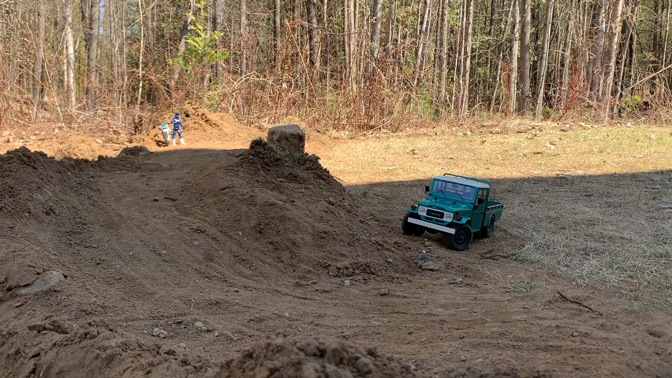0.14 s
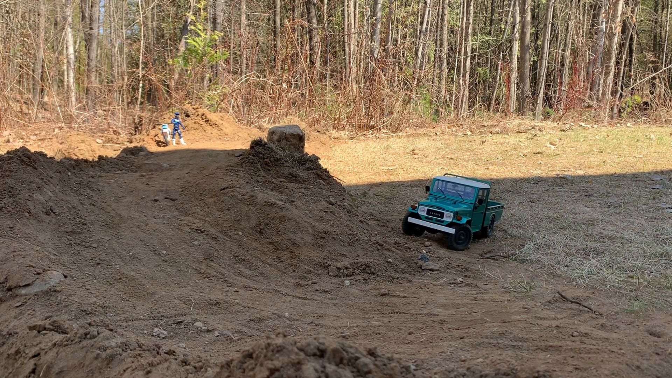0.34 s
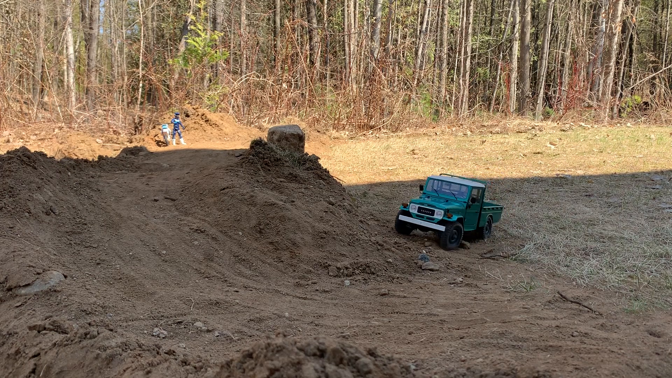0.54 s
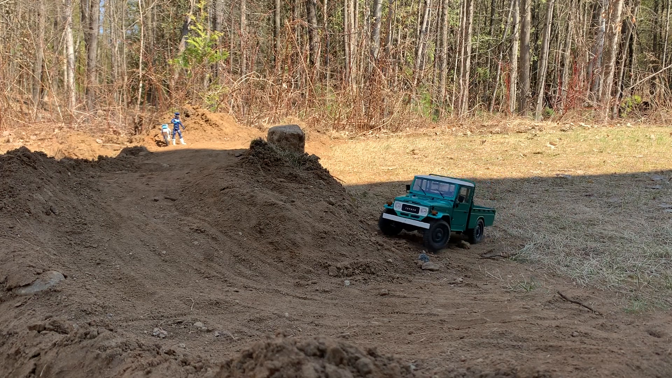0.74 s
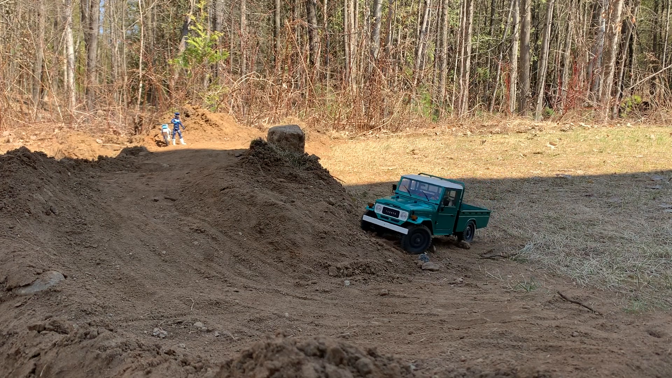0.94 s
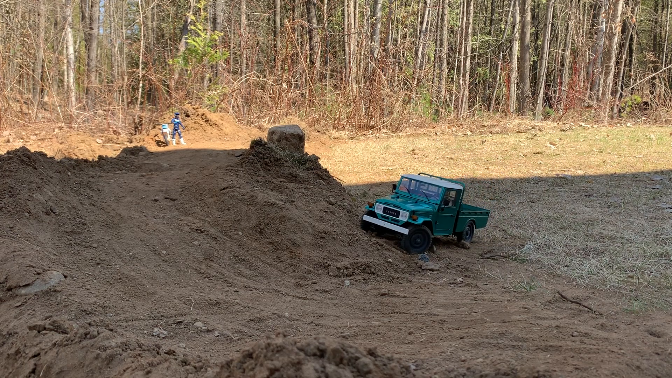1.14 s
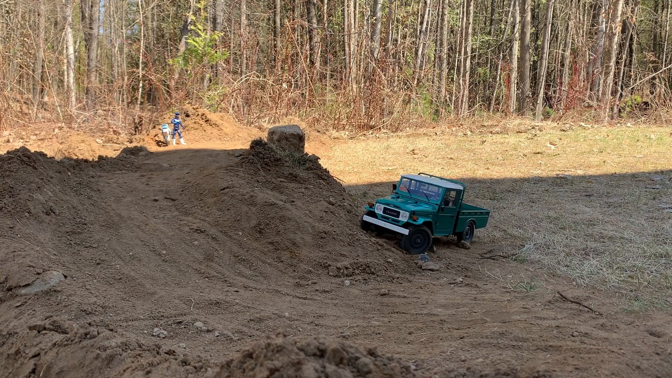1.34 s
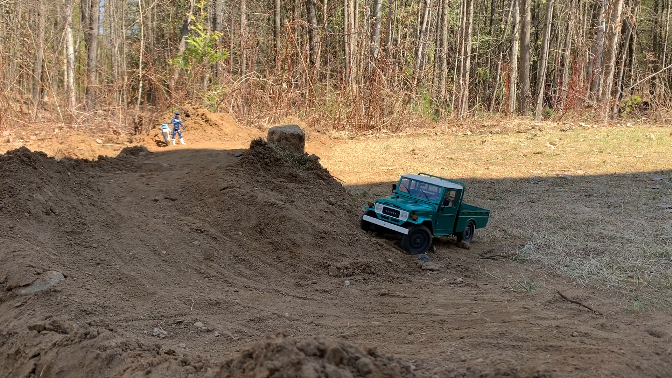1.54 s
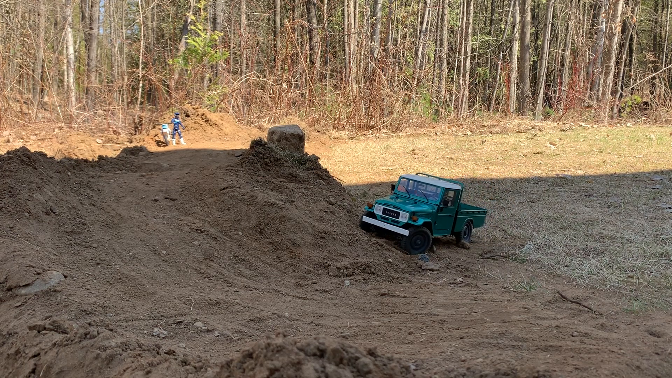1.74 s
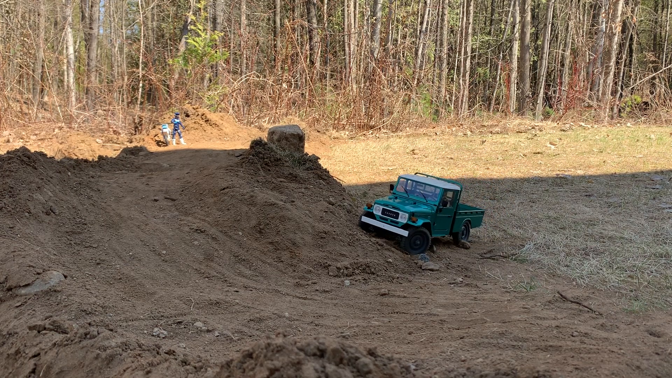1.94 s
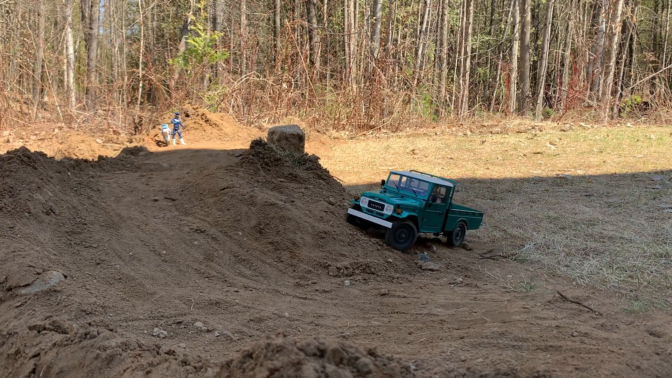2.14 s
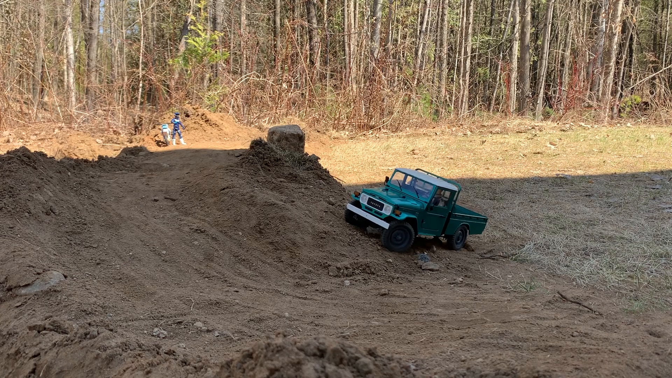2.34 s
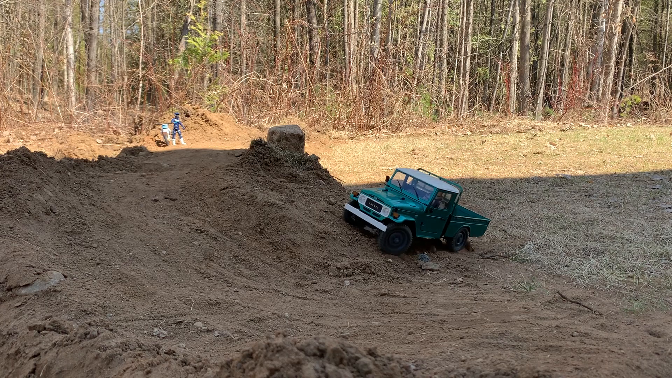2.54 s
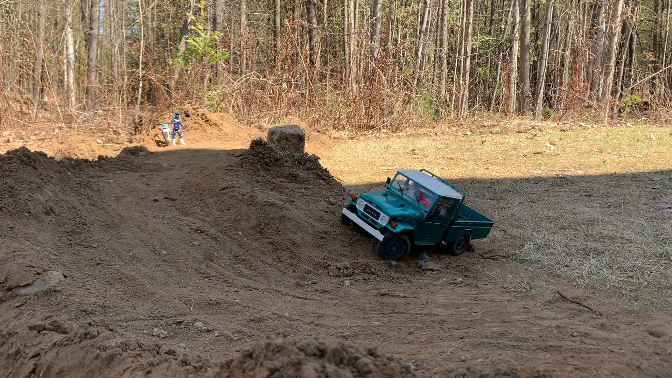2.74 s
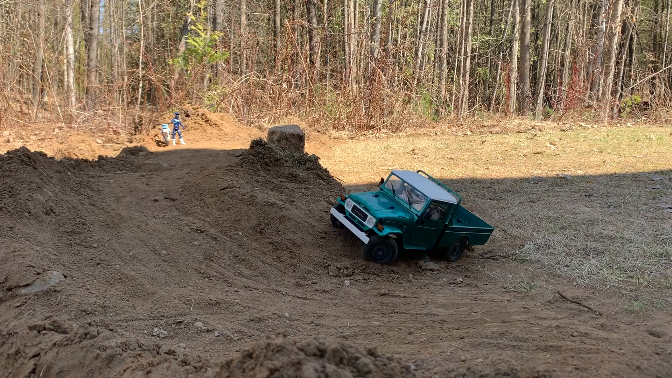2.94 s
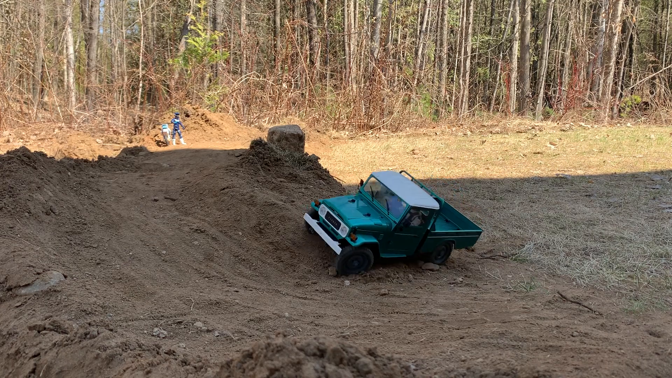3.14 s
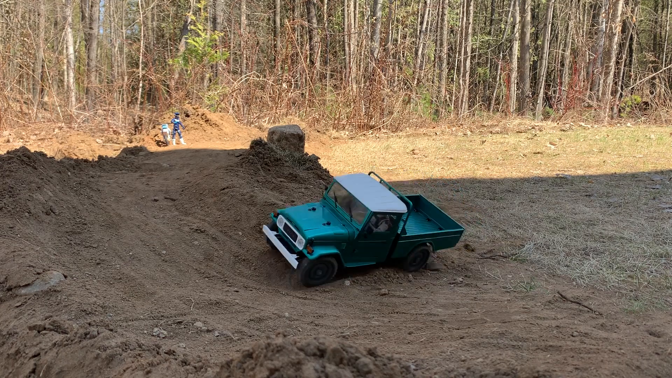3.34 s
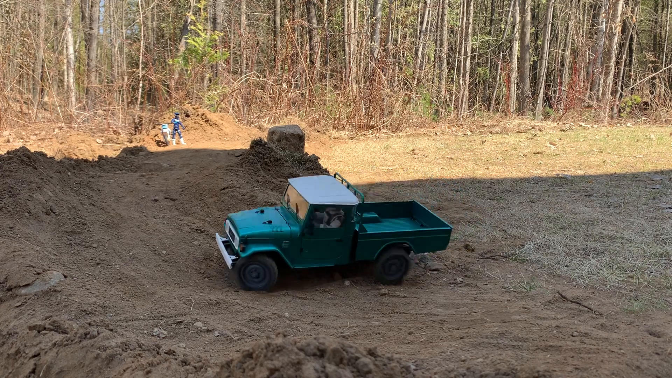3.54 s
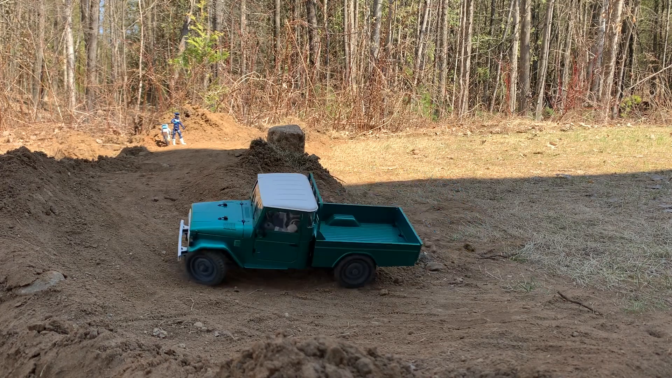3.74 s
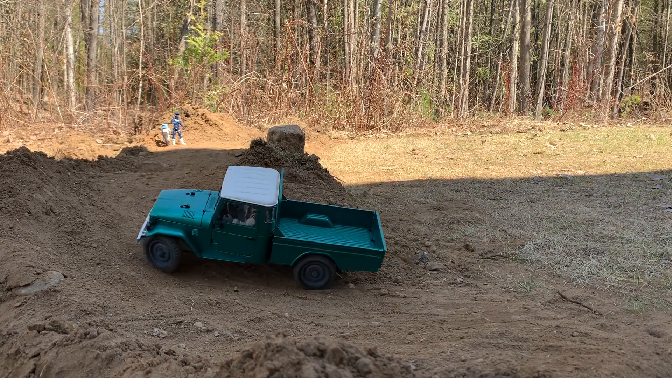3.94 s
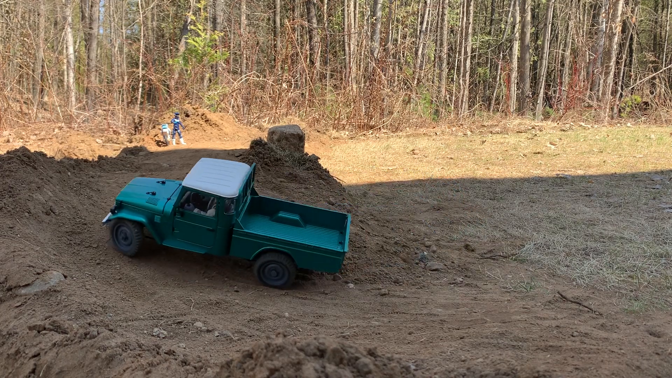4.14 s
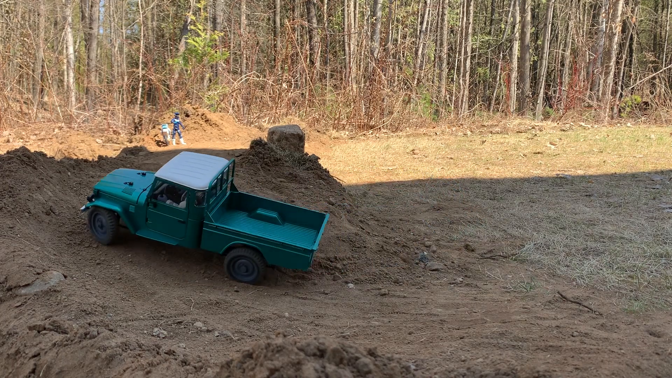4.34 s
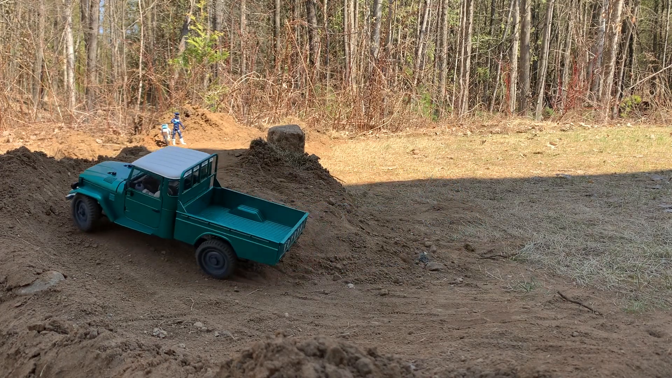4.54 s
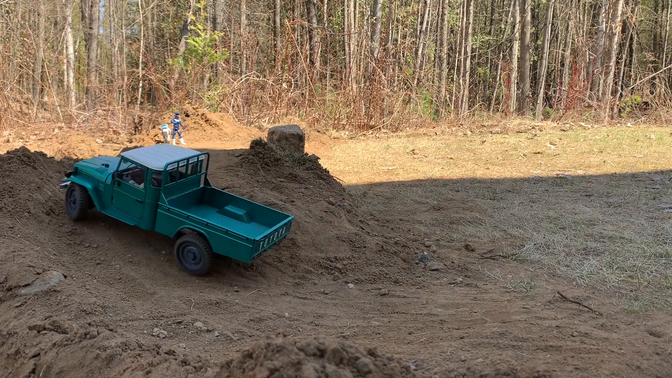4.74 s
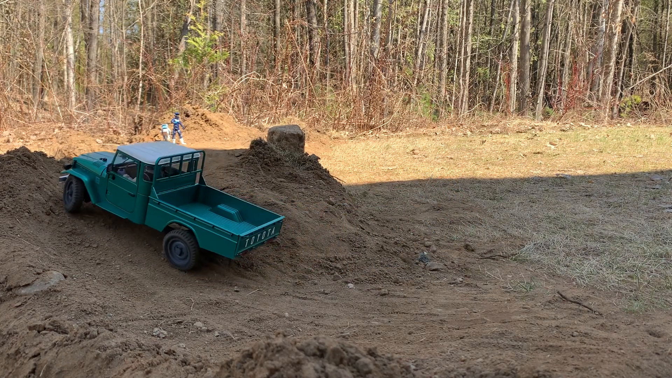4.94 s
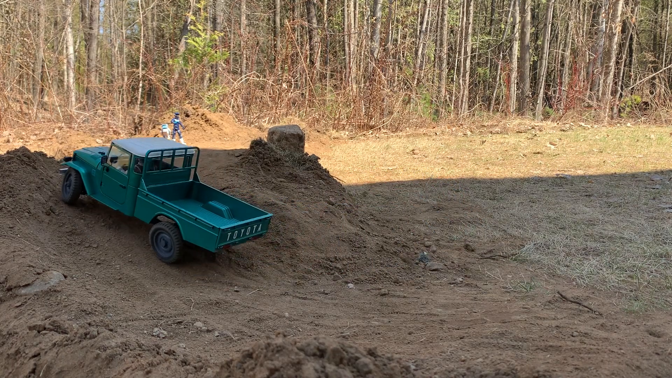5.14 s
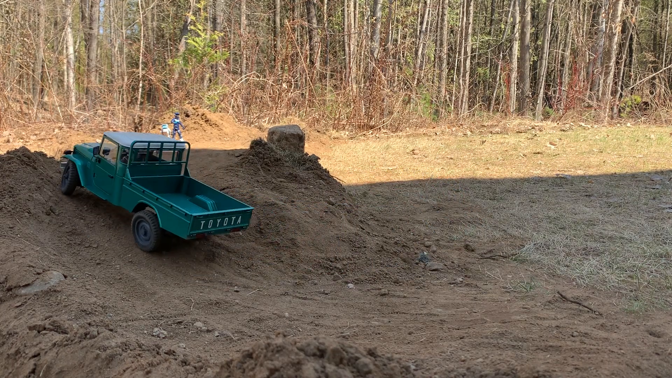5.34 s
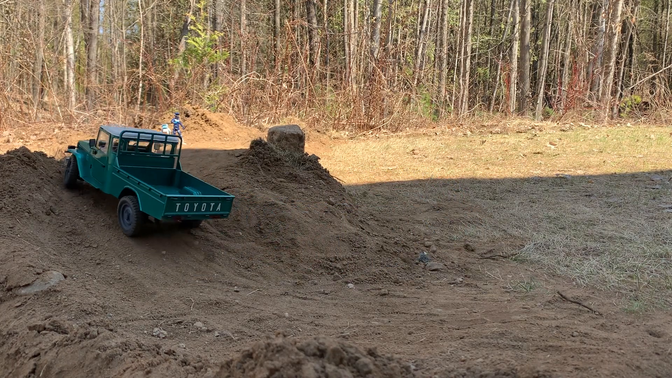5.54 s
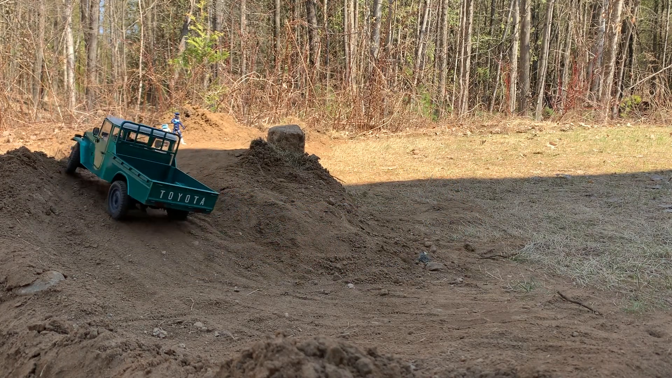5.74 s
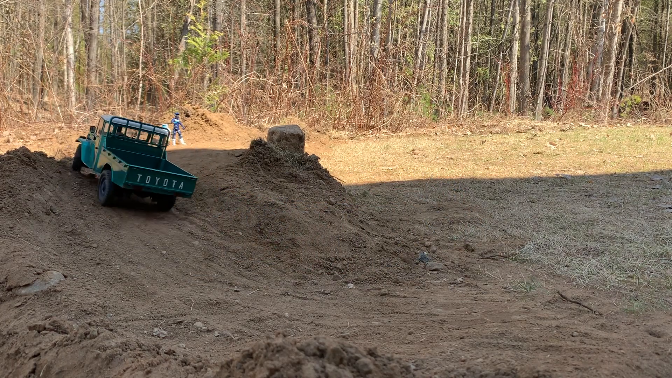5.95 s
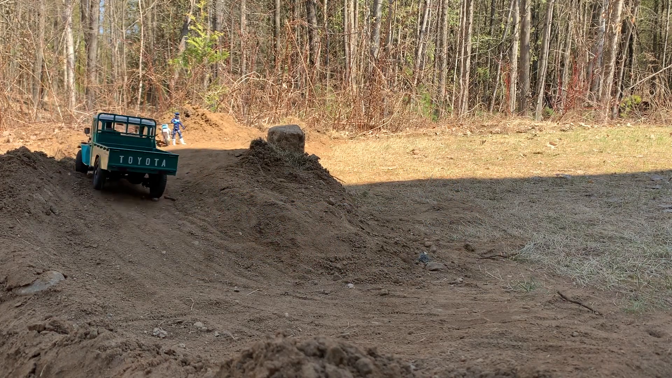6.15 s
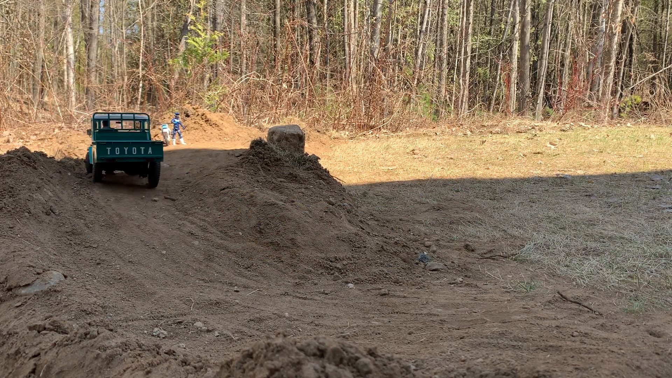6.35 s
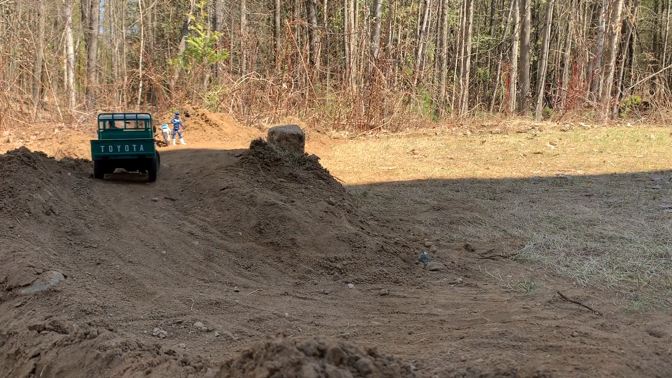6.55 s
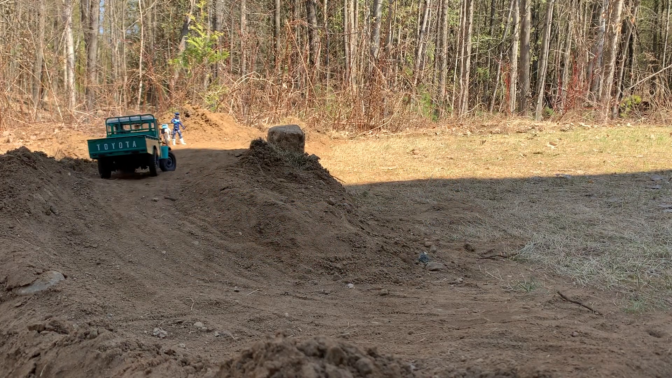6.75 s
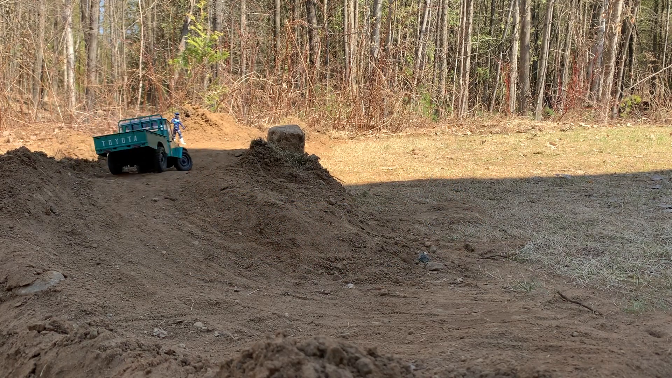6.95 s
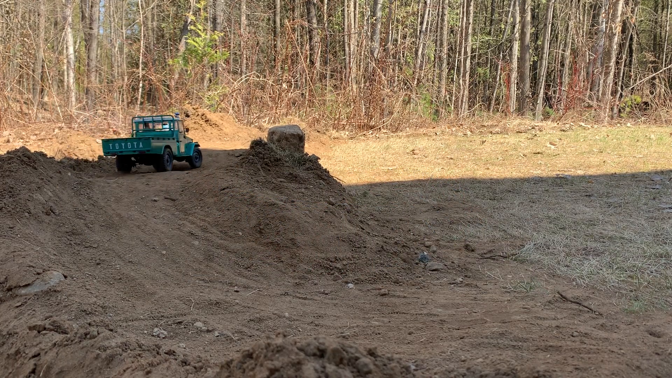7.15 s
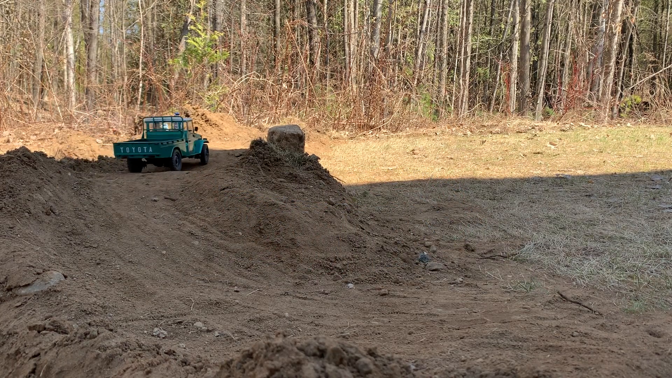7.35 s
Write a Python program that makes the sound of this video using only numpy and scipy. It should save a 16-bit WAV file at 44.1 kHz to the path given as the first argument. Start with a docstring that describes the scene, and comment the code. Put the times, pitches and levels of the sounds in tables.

```python
"""Toy truck on dirt

A small electric toy truck crawls, stops and climbs over dirt a few metres from a stereo camera.
Gear teeth and motor whine follow its speed, slack gears knock, and shaking rings the plastic shell.
Brushes hiss in noise bands, a steering servo hums, and the speed controller sings one thin tone.
Behind it lies the quiet rumble of open woodland; two dry ticks come from the right.
"""
import sys
import numpy as np
from scipy import signal
from scipy.fft import rfft, irfft
from scipy.io import wavfile
from scipy.ndimage import uniform_filter1d, map_coordinates

SR = 44100
rng = np.random.default_rng(int(sys.argv[2]) if len(sys.argv) > 2 else 0)


def dump_mix(stems):
    """Bounce the given channels to the path in sys.argv[1] as a 16-bit WAV at rate SR."""
    frames = np.atleast_2d(stems).T  # one column per channel
    limited = np.clip(frames, -1, 1)  # hard clip at full scale
    pcm = np.round(limited * 32767).astype(np.int16)
    wavfile.write(sys.argv[1], SR, pcm)


N = 325458
T = np.arange(N) / SR  # time of each sample, s

# All table levels are relative: later mixing gains and wobbles come on top.
# Colour of the woodland air: pitch_hz, level_db
WOODS_COLOUR = [(21, -59), (35, -7), (97, -3), (126, -5), (151, -12), (623, -16), (1280, -26),
                (3090, -26.5), (7140, -32.5), (7830, -59), (9000, -78.5), (11700, -87), (19800, -120)]
WOODS_DB = -73.5
# Distant rumble: time_s, level_db
RUMBLE = [(0.0, -76), (0.18, -74), (1.6, -76.5), (1.66, -70.5), (3.9, -76.5), (4.3, -77), (6.47, -80.5),
          (6.74, -72), (7.38, -70)]
# Something small ticks off to the right: time_s, strength_db
TICKS = [(1.535, -57.5), (1.5526, -58)]

# Throttle and load: time_s, shell_rattle_db, brush_hiss_db
DRIVE = [(0, -51, -52.5), (.1, -54.5, -47.5), (.55, -54.5, -45), (1.0, -54, -44.5), (1.66, -52, -54),
         (1.99, -43, -38), (2.1, -48.5, -44), (2.29, -46.5, -36), (2.52, -48.5, -43.5), (2.68, -49.5, -41),
         (2.9, -50.5, -42), (2.99, -45.5, -38), (3.21, -44, -34), (3.55, -43.5, -36), (3.8, -43, -39),
         (4.07, -44, -41.5), (4.17, -49, -46), (4.75, -54.5, -53), (5.15, -53.5, -52.5), (5.68, -52, -47.5),
         (5.9, -51.5, -42), (6.15, -54, -48), (6.55, -58, -60.5), (7.04, -58.5, -59), (7.38, -59, -65.5)]
# Speed of the drive: time_s, tooth_mesh_hz (teeth meeting per second)
MESH = [(0, 560), (.6, 730), (1, 800), (1.66, 600), (1.97, 655), (2.2, 790), (2.55, 660), (2.71, 775),
        (2.88, 735), (2.96, 980), (3, 1060), (3.12, 1000), (3.21, 1230), (3.255, 1000), (3.3, 1150),
        (3.5, 1120), (3.82, 830), (4.08, 850), (4.17, 590), (5.1, 480), (5.55, 680), (5.66, 695),
        (5.8, 815), (5.88, 905), (6.03, 915), (6.12, 935), (6.22, 910), (6.33, 975), (6.39, 875),
        (6.58, 850), (6.9, 915), (7.02, 890), (7.09, 745), (7.38, 540)]
TEETH = 10  # tooth contacts per shaft turn
MESH_WANDER = .007  # the wheels slip and grip: spread as a share of the mesh rate
# Throttle let go: start_s, back_s, shell_drop_db
LET_OFFS = [(0.049, 0.317, 8.5), (1.002, 1.297, 9), (1.721, 1.969, 15), (2.298, 2.485, 10),
            (2.689, 2.841, 7.5), (3.385, 3.494, 2), (3.573, 3.764, 3.5), (4.237, 4.384, 3.5),
            (4.798, 5.101, 5)]
# The truck stands still: halt_s, moving_again_s
STANDS = [(.18, .53), (1.1, 1.65)]
STILL_DB = 35  # drop of the shell rattle at a stand
COAST_DB_PER_S, PICK_UP_DB_PER_S = 110, 218.5
# the shell rattles on after the motor halts, so it runs down more slowly
HALT_DB_PER_S, RUN_DOWN_DB_PER_S, SET_OFF_DB_PER_S = 399, 187, 351.5
WHIRR_DROP, HISS_DROP = 1.55, 1.54  # dB lost per dB of drop
MESH_DROP_PER_DB = .008  # share of the mesh rate lost per dB of drop
# A wheel catches on a clod and slows the drive: time_s, share_of_mesh_rate_lost
CATCHES = [(3.06, .16), (3.33, .1), (4.11, .08), (5.7, .08), (5.84, .09), (5.98, .09), (6.165, .12),
           (6.27, .09), (6.375, .08), (6.51, .15), (6.96, .06)]
CATCH_S = .022

# Steering servo holds the wheels: start_s, end_s, start_hum_db, end_hum_db
SERVO_HOLDS = [(0, 0.21, -61, -67), (0.443, 1.092, -68, -62.5), (1.601, 1.97, -62, -60.5),
               (1.971, 3.562, -58.5, -62.5), (4.7, 5.3, -68, -68)]
# Servo strains briefly: time_s, hum_db
SERVO_STRAINS = [(.13, -55.5), (.57, -49), (.99, -54.5), (1.73, -52.5), (2.013, -51), (2.09, -56),
                 (2.156, -52.5), (2.322, -54.5), (2.434, -56.5), (2.526, -48), (2.595, -51), (2.702, -53.5),
                 (2.838, -50), (2.902, -55), (5.14, -56)]
SERVO_HZ = 1870
SERVO_START_DB_PER_S, SERVO_STOP_DB_PER_S, STRAIN_DB_PER_S = 901, 257, 320

# Speed controller tone: time_s, level_db
SWITCHING = [(0, -62), (.5, -62), (1.05, -58), (1.46, -58), (1.5, -66), (1.54, -57), (2.6, -55), (2.8, -63),
             (3.4, -62), (4.65, -54), (4.95, -71), (5.2, -72), (5.32, -63), (5.95, -63), (6.2, -70),
             (7.38, -75)]
SWITCHING_HZ = 10664

# Colour of the brush hiss, lower edge then body: pitch_hz, level_db
HISS_EDGE = [(6900, -40), (7600, -14), (8400, -10)]
HISS_COLOUR = [(9300, -2), (10300, 1), (11800, 1.5), (12800, 0), (14000, -5), (15500, -12), (17000, -0.5)]

# Motor tones: shaft_rate_multiple, climbing_db, over_crest_db
MOTOR_TONES = [(6, -17, -19), (8, -21, -26), (9, -20, -11.5), (10, -15, -21), (12, -23, -21),
               (14, -28, -21)]
CREST_S = (6.45, 6.6)  # the load eases over the crest of the mound
# Teeth sing more as they mesh faster: mesh_hz, whine_against_grit_db
WHINE_BY_SPEED = [(520, -17), (700, -9), (1000, -5)]
# Driving away bares the gearbox: time_s, gain_db
TAIL_ON = [(5, 0), (5.6, 6), (7, 6), (7.2, -2)]

# Backlash knocks: time_s, strength_db, treble_against_strength_db
KNOCKS = [(0.019, -48, -18), (0.033, -44, -18), (0.045, -41.5, -10), (0.077, -39, -7), (0.131, -40, -9),
          (0.175, -38, -10.5), (0.415, -45, -21), (0.496, -42.5, -9), (0.599, -40.5, -10),
          (0.642, -42, -16), (0.711, -40.5, -17), (0.773, -51, -6), (0.798, -39, -20), (0.823, -40, -19),
          (0.849, -43, -8), (0.959, -51, -10), (1.591, -38, -26), (1.606, -46, -22), (1.632, -35.5, -17),
          (1.657, -34, -11), (1.677, -36, -22), (1.694, -38, -13), (1.734, -47, -12), (1.769, -53, -5),
          (1.799, -53, -1.5), (1.827, -50, -6), (1.952, -40.5, -6), (1.989, -38, -7), (2.02, -30, -15),
          (2.359, -39, -11), (2.397, -36.5, -18), (2.435, -37.5, -17), (2.753, -34, -30),
          (2.777, -35.5, -19), (4.272, -40, -17), (4.37, -38, -18), (4.428, -51, -17), (4.534, -45, -17),
          (4.608, -40, -22), (4.666, -46, -19), (4.746, -43, -23), (4.797, -34.5, -27), (4.813, -37, -27),
          (4.893, -40, -16), (4.929, -36.5, -13.5), (4.961, -37, -16), (5.001, -40.5, -12),
          (5.033, -50, -20), (5.115, -36, -21), (5.149, -42, -12), (5.221, -41, -18), (5.277, -39.5, -11),
          (5.314, -38, -9), (5.387, -38, -15)]
PUSH_S, CHATTER_S, CHATTER_DB, CRACK_S = 0.00096, 0.011, -2, 0.0062
THUD_HZ = 1700  # a knock reaches the shell without its treble

# Where the truck is, how it faces, and how loud its whirr is against rattle and hiss:
# time_s, left_leads_ms, left_minus_right_db, whirr_against_rattle_and_hiss_db,
# open_underside_db, cargo_bed_boom_db, bonnet_buzz_db
BEARING = [(0, 0.035, -2, -5.5, -9, -10, 2.5), (1, 0.042, -1, -2.5, -26.5, -9.5, 2.5),
           (2.5, 0.032, -0.5, -10.5, -46, -12, -2), (3.2, 0.047, 0.5, -9.5, -25, -11, -0.5),
           (3.5, 0.072, 1.5, -19.5, 2, -12.5, -6), (3.7, .12, 1.5, -4.5, -24, -11, 0.5),
           (4, 0.21, 2, -12.5, 7, -14, -9), (4.5, 0.22, 3.5, -11, 11.5, -6.5, -18),
           (5.5, 0.25, 4.5, -3, -0.5, -8.5, -4.5), (6, 0.27, 3.5, -4.5, -22, -11.5, -15),
           (6.5, 0.28, 5, -0.5, -2.5, -13.5, -2), (7.38, 0.24, 3, -1, -1.5, -6.5, -3)]
# Ringing modes of the plastic shell: pitch_hz, width_hz, level_db
SHELL_MODES = [(388, 22, -17.5), (604.6, 105.6, 10), (763, 169, 5.5), (990, 196, 1), (1435, 740, -6),
               (249, 136, -16.5)]
# Cargo bed, bonnet and side panel, one mode each: pitch_hz, width_hz
BED_MODE = (415.7, 113)
BONNET_MODE = (642.3, 170)
FLANK_MODE = (576, 74)
# Side panel ring as the flank turns to the listener: time_s, level_db
FLANK_ON = [(0, -22.5), (3.6, -21), (4.3, 0.5), (5.5, -4.5), (5.9, -16.5), (6.3, -8), (7.38, -24)]

# Ringing modes of the gearbox: pitch_hz, width_hz, level_db
GEARBOX_MODES = [(2750, 400, 0), (3650, 260, 2), (4120, 170, 4), (4550, 300, -5), (5300, 380, 2),
                 (5850, 200, 1), (6350, 400, 2), (7000, 600, -1)]
CAB_MASK_DB, CAB_MASK_HZ = 11, 5700  # from the front the cab hides the lower gearbox modes
# Colour of the gear whirr: pitch_hz, level_db
WHIRR_COLOUR = [(1300, -12), (2200, 5), (2900, -3.5), (3800, 5.5), (4800, 3), (5500, 1.5), (6500, 14),
                (7300, 11), (8000, -22), (8800, -148)]
# Gain of the top of the gear grit: time_s, level_db
WHIRR_TOP = [(0, -22), (1.2, -22), (1.7, 0.5), (3.3, -4.5), (4.4, -6.5), (4.9, -8), (5.5, -7.5),
             (7.38, -12)]
# Axle housings under the truck: pitch_hz, width_hz
UNDERSIDE_MODES = [(2660, 325), (1560, 254)]

TOP_HZ = 15850  # highest pitch the camera lets through


def undb(db):
    """Turn decibels into gain."""
    return 10 ** (np.asarray(db) / 20)


def unit(x):
    """Scale to an rms level of 1."""
    return x / np.sqrt(np.mean(x ** 2))


def curves(table):
    """Draw each column of a table as a line over time."""
    s, *columns = np.transpose(table)
    return [np.interp(T, s, c) for c in columns]


def colour(x, points):
    """Shape how loud each pitch is, from (Hz, dB) points."""
    hz, db = np.transpose(points)
    f = np.arange(N // 2 + 1) * SR / N + 1
    return irfft(rfft(x) * undb(np.interp(np.log(f), np.log(hz), db)), N)


def ring(x, hz, width):
    """Make one pitch resonate, with gain 1 at its centre."""
    return signal.lfilter(*signal.iirpeak(hz, hz / width, SR), x)


def panel(x, hz, width):
    """A thin panel rings steeply: one resonance used twice."""
    return ring(ring(x, hz, width), hz, width)


def walk(rate):
    """Wander at random: levels held for 1 / rate s, smoothed twice, rms 1."""
    k = int(SR / rate)
    steps = np.repeat(rng.standard_normal(N // k + 1), k)
    return unit(uniform_filter1d(uniform_filter1d(steps, k), k)[:N])


def ports(x, lead_ms, pan_db):
    """Two spaced microphone ports: time and level differences place a sound left or right."""
    half = lead_ms * SR / 2000  # half the lead, in samples
    at = np.arange(N)
    return np.array([map_coordinates(x, [at + side * half], order=3) * undb(side * pan_db / 2)
                     for side in (1, -1)])


def widen(x, lag_ms=0.1977, turn=1.0):
    """The camera spreads one treble signal over both channels by a fixed lag and phase turn."""
    f = np.arange(N // 2 + 1) * SR / N
    half = np.exp(.5j * (turn - 2 * np.pi * f * lag_ms / 1000))
    return np.array([irfft(rfft(x) * half, N), irfft(rfft(x) / half, N)])


def woods():
    """Distant rumble and air: both ports share much of the bass but none of the rest."""
    shared, left, right = (unit(colour(rng.standard_normal(N), WOODS_COLOUR)) for _ in range(3))
    low = signal.butter(2, 330, fs=SR, output="sos")
    own = np.array([left, right])
    bass = signal.sosfilt(low, 1.9 * shared + 0.84 * own)
    bass = bass * undb(2.5 * walk(6))  # it comes and goes
    air = own - signal.sosfilt(low, own)
    return undb(curves(RUMBLE)[0]) * bass + undb(WOODS_DB) * air


def ticks():
    """Two short noise bursts ring at middle and high pitch, louder on the right."""
    hit = np.zeros(N)
    for s, strength_db in TICKS:
        hit[int(s * SR)] = undb(strength_db)
    burst = np.exp(-T[:800] / 0.0058) * rng.standard_normal(800)
    tick = signal.fftconvolve(hit, burst)[:N]
    ringing = ring(tick, 1600, 900) + ring(ring(tick, 3400, 1100), 3700, 1100)
    return ringing * undb([[-6], [8]])


def sink(start, back, db, down, up):
    """Drop in dB: falls from start, stays at most db deep, and is gone again at back."""
    return np.clip(np.minimum(down * (T - start), up * (back - T)), 0, db)


def let_off_db(halt_db_per_s):
    """How far the drive has sunk: it coasts or halts, waits and picks up again."""
    coasting = np.max([sink(*row, COAST_DB_PER_S, PICK_UP_DB_PER_S) for row in LET_OFFS], axis=0)
    return coasting + sum(sink(*row, STILL_DB, halt_db_per_s, SET_OFF_DB_PER_S) for row in STANDS)


def caught():
    """Share of the mesh rate kept as the wheels catch and break free."""
    return 1 - sum(share * np.exp(-((T - s) / CATCH_S) ** 2) for s, share in CATCHES)


def shaft(turns, scatter_db, sharp):
    """Load swells once a shaft turn, every turn by its own amount."""
    size = undb(scatter_db * np.clip(rng.standard_normal(int(turns[-1]) + 1), -2, 1.6))
    return unit(1 + sharp * size[turns.astype(int)] * np.exp(-(turns % 1) / 2.1))


def servo_db():
    """Servo hum level: it holds between start and end and peaks at each strain."""
    levels = [db - STRAIN_DB_PER_S * np.abs(T - s) for s, db in SERVO_STRAINS]
    for start, end, start_db, end_db in SERVO_HOLDS:
        held = np.interp(T, [start, end], [start_db, end_db])
        before = SERVO_START_DB_PER_S * np.maximum(start - T, 0)
        after = SERVO_STOP_DB_PER_S * np.maximum(T - end, 0)
        levels.append(held - before - after)
    return np.max(levels, axis=0)


def servo():
    """A stalled steering motor gives a rough hum in one wavering resonance."""
    rough = ring(rng.standard_normal(N), 976, 88)
    # the noise band is carried up to the resonance
    shift_hz = SERVO_HZ * (1 + .016 * walk(35)) - 1000
    carrier = np.exp(2j * np.pi * np.cumsum(shift_hz) / SR)
    hum = unit(np.real(signal.hilbert(rough) * carrier))
    return undb(servo_db() + 2 * walk(39.43)) * hum


def controller_tone(hiss_db):
    """The speed controller sings one sine that trembles more as the motor works harder."""
    load = np.clip((hiss_db + 67.0) / 25, 0, 1)
    level = undb(curves(SWITCHING)[0] + 5 * load * walk(40))
    return np.sqrt(2) * level * np.sin(2 * np.pi * SWITCHING_HZ * T + .8 * load * walk(60))


def brushes(turns):
    """Brush hiss in narrow bands that swell and flicker apart as the truck rocks."""
    bands = sum(undb(1.5 * walk(3) + 3.8 * walk(25)) * ring(rng.standard_normal(N), hz, 280)
                for hz in np.arange(7600, 16000, 400))
    return unit(colour(bands, HISS_EDGE + HISS_COLOUR)) * shaft(turns, scatter_db=4, sharp=.5)


def tone_gain_db(mesh_hz):
    """Gain of hum and motor tones, rising with mesh speed and with the tail gain."""
    return np.interp(mesh_hz, *np.transpose(WHINE_BY_SPEED)) + curves(TAIL_ON)[0]


def motor(mesh_hz, turns):
    """Tones locked to the shaft swell separately; flutter under load lessens over the crest."""
    flutter = np.interp(T, CREST_S, [1, .4])
    tones = np.zeros(N)
    for k, *db in MOTOR_TONES:
        level = undb(np.interp(T, CREST_S, db) + flutter * (2.5 * walk(9) + 4 * walk(70)))
        tones += level * np.sqrt(2) * np.sin(2 * np.pi * k * turns + flutter * walk(80))
    # the tail gain counts twice for these tones
    return undb(tone_gain_db(mesh_hz) + curves(TAIL_ON)[0]) * tones


def gears(mesh_hz, turns):
    """Uneven tooth contacts give beaded mesh tones that ring the gearbox; grit fills in."""
    tremble = .006 * walk(40) + .009 * walk(110) + .004 * np.sin(2 * np.pi * turns)
    phase = 2 * np.pi * np.cumsum(mesh_hz * (1 + tremble)) / SR
    # no two teeth alike: each multiple is smeared into a narrow band
    multiples = [undb(2 * walk(60)) * (walk(380) * np.sin(k * phase) + walk(380) * np.cos(k * phase))
                 for k in range(1, 11)]
    tail = curves(TAIL_ON)[0]
    masked_db = CAB_MASK_DB * (1 - tail / tail.max())
    upper = sum(multiples[2:])
    whine = np.zeros(N)
    for k, (hz, width, db) in enumerate(GEARBOX_MODES):
        # neighbouring modes swing opposite ways
        whine += (-1) ** k * undb(db - masked_db * (hz < CAB_MASK_HZ)) * ring(upper, hz, width)
    tone_gain = undb(tone_gain_db(mesh_hz))
    grit = sum(undb(2.5 * walk(4) + 3 * walk(16)) * ring(rng.standard_normal(N), hz, 300)
               for hz in np.arange(1500, 9000, 300))
    # a rough band hums a little under the mesh rate
    hum = walk(450) * np.sin(.91 * phase) + walk(450) * np.cos(.91 * phase)
    hum = hum + undb(-13) * multiples[1]
    hum = tone_gain * undb(-masked_db / 2) * unit(hum)
    # the tooth whine takes the tail gain off again, and slightly more
    teeth = undb(6 - 1.15 * tail) * tone_gain * unit(whine)
    grit = unit(colour(grit, WHIRR_COLOUR)) * shaft(turns, scatter_db=3, sharp=.4)
    return hum, teeth, grit


def knocks():
    """Slack gears hit: a push, rebound and chatter for the body, and a short crack."""
    push, crack = np.zeros(N), np.zeros(N)
    t = T[:900]
    noises = rng.standard_normal((len(KNOCKS), len(t)))
    for (s, strength_db, treble_db), noise in zip(KNOCKS, noises):
        at = slice(int(s * SR), int(s * SR) + len(t))
        swing = np.sin(2 * np.pi * np.minimum(t / PUSH_S, 1))
        chatter = undb(CHATTER_DB) * np.exp(-t / CHATTER_S) * noise
        push[at] += undb(strength_db - 13.0) * (swing + chatter)
        crack[at] += undb(strength_db + treble_db + 7.0) * np.exp(-t / CRACK_S) * noise
    thud = signal.sosfilt(signal.butter(2, THUD_HZ, fs=SR, output="sos"), push)
    return thud, undb(2) * panel(crack, 1630, 2130)


def shell(x):
    """The plastic shell rings with its modes, neighbours swinging opposite ways."""
    return sum((-1) ** k * undb(db) * ring(x, hz, width)
               for k, (hz, width, db) in enumerate(SHELL_MODES))


def body(x, shake, panels):
    """Shell and panels ring with x, each scaled by how strongly plain shaking rings it."""
    ringing = shell(x) / np.std(shell(shake))
    return ringing + sum(undb(db) * panel(x, *mode) / np.std(panel(shake, *mode))
                         for db, mode in panels)


def ground_scatter(whirr_db, shell_db):
    """Ground and mound scatter a little unrelated sound into each port."""
    sides = []
    for _ in range(2):
        whirr = undb(whirr_db - 9.5) * unit(colour(rng.standard_normal(N), WHIRR_COLOUR))
        rattle = undb(shell_db - 12) * unit(shell(rng.standard_normal(N)))
        sides.append(whirr + rattle)
    return np.array(sides)


def scene():
    """Shell, servo and gears move across the ports; hiss and controller tone are widened."""
    (mesh_hz,), (shell_db, hiss_db) = curves(MESH), curves(DRIVE)
    lead_ms, pan_db, whirr_balance_db, under_db, bed_db, bonnet_db = curves(BEARING)

    # letting go of the throttle lowers rattle, whirr, hiss and speed
    drop = let_off_db(HALT_DB_PER_S)
    whirr_db = (shell_db + hiss_db) / 2 + whirr_balance_db - WHIRR_DROP * drop
    shell_db = shell_db - let_off_db(RUN_DOWN_DB_PER_S)
    hiss_db = hiss_db - HISS_DROP * drop
    mesh_hz = mesh_hz * (1 - MESH_DROP_PER_DB * drop) * (1 + MESH_WANDER * walk(24)) * caught()
    turns = np.cumsum(mesh_hz) / SR / TEETH

    hum, teeth, grit = gears(mesh_hz, turns)
    shake = rng.standard_normal(N) * shaft(turns, scatter_db=4, sharp=1.6)
    push, crack = knocks()
    # shaking and knocks ring the same panels, each heard as far as it faces the listener
    panels = [(bed_db, BED_MODE), (bonnet_db, BONNET_MODE), (curves(FLANK_ON)[0], FLANK_MODE)]
    rattle = body(shake, shake, panels) + undb(-8) * hum + motor(mesh_hz, turns)
    low = undb(shell_db) * rattle + body(push, shake, panels) + crack + servo()

    under = sum(ring(grit, hz, width) for hz, width in UNDERSIDE_MODES)
    grit = grit + (undb(curves(WHIRR_TOP)[0]) - 1) * ring(grit, 6100, 2200)
    whirr = undb(whirr_db - 2.5) * (teeth + grit + undb(under_db) * unit(under))
    scatter = ground_scatter(whirr_db, shell_db)
    high = controller_tone(hiss_db) + undb(hiss_db - 3.0) * brushes(turns)

    # the whirr has its own, slightly different place
    whirr = ports(whirr, .8 * lead_ms - .012, -1.3)
    return ports(low, lead_ms, pan_db) + whirr + scatter + widen(high) + ticks() + woods()


def record(dry):
    """The camera cuts the top with a steep low-pass filter."""
    return signal.sosfilt(signal.ellip(14, .2, 80, TOP_HZ, fs=SR, output="sos"), dry)


dry = scene()
out = record(dry)
dump_mix(out)
```